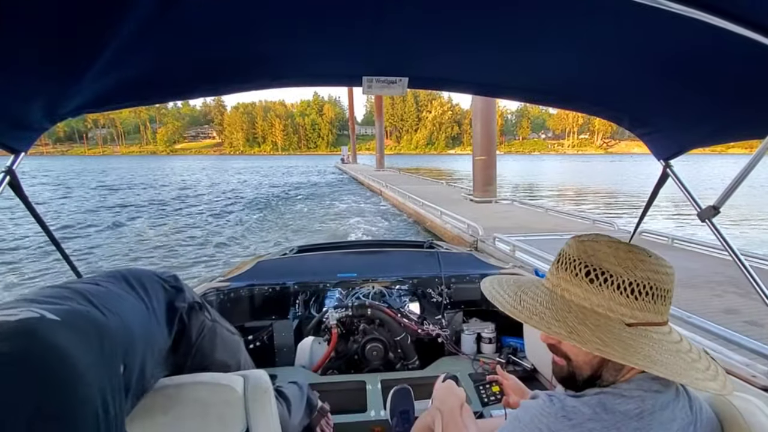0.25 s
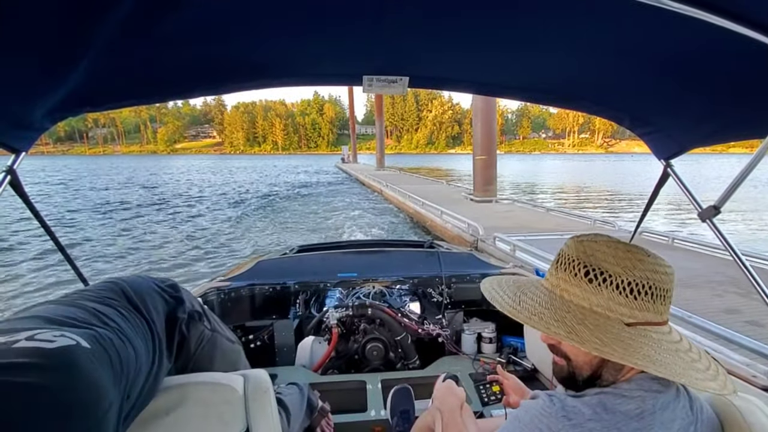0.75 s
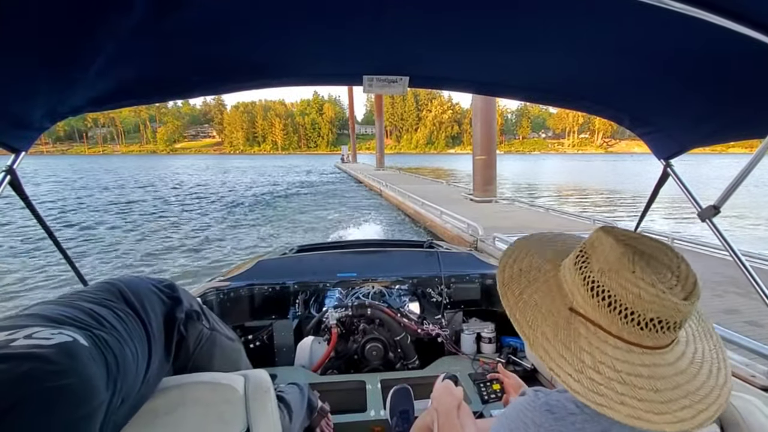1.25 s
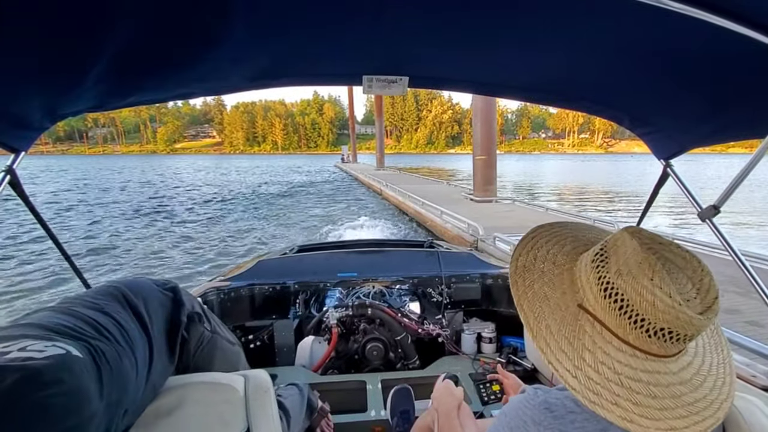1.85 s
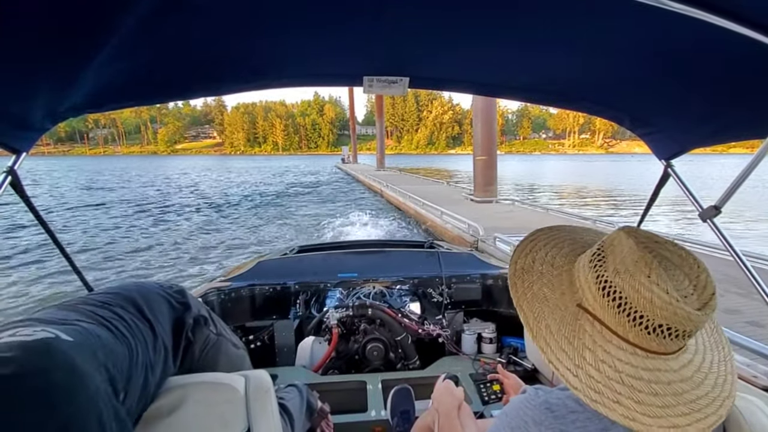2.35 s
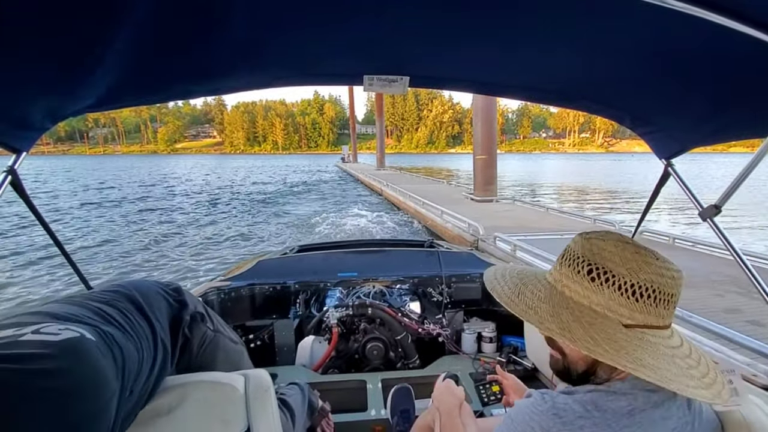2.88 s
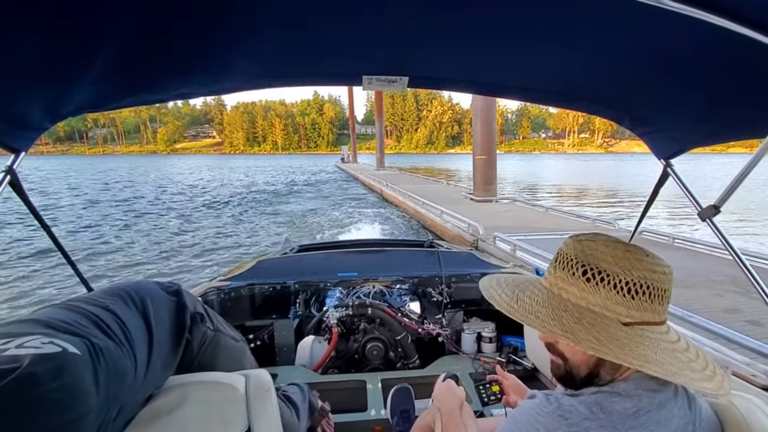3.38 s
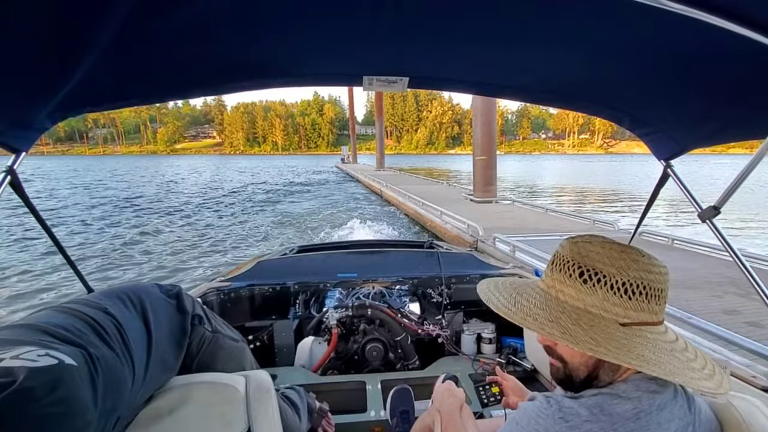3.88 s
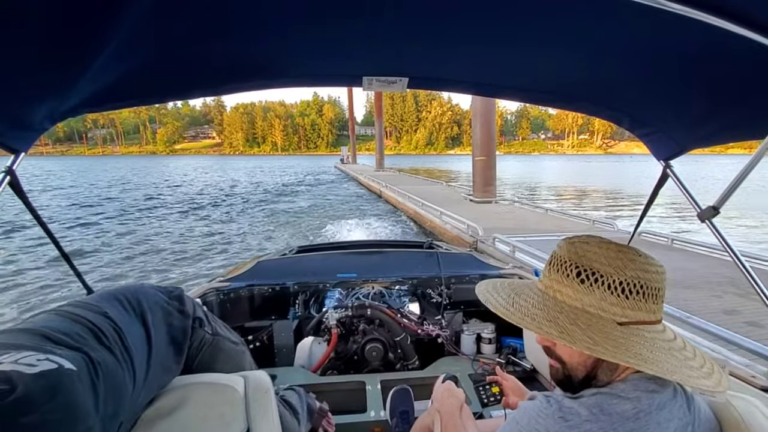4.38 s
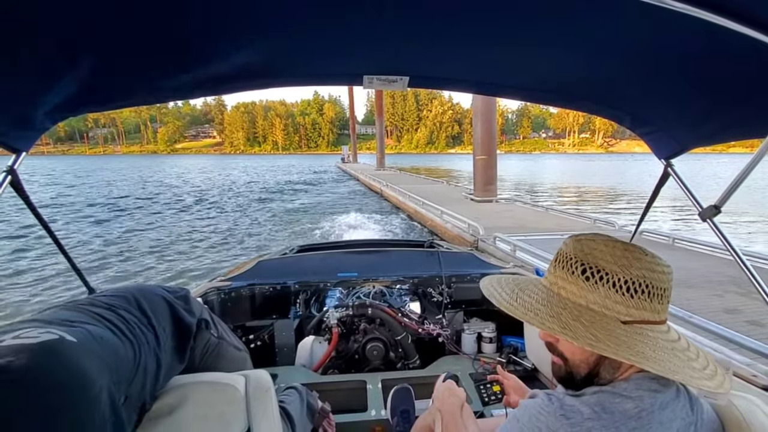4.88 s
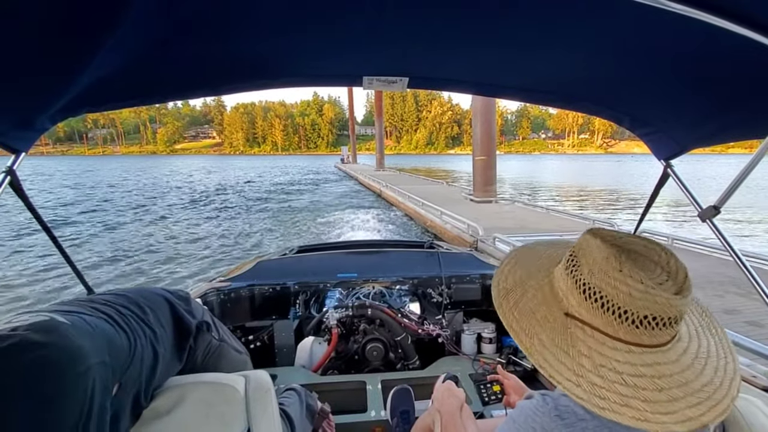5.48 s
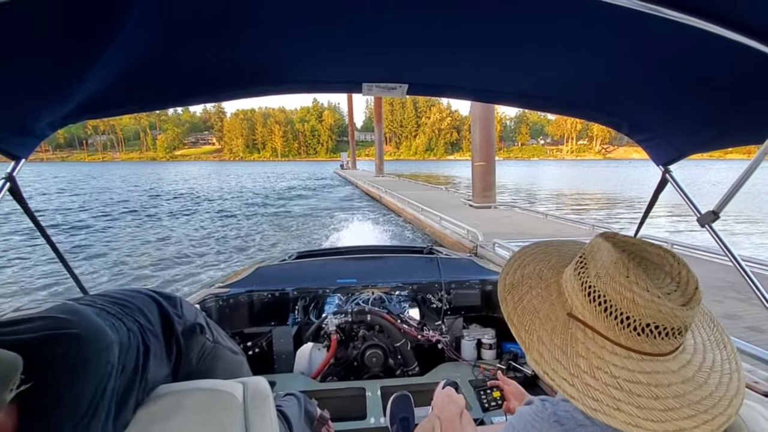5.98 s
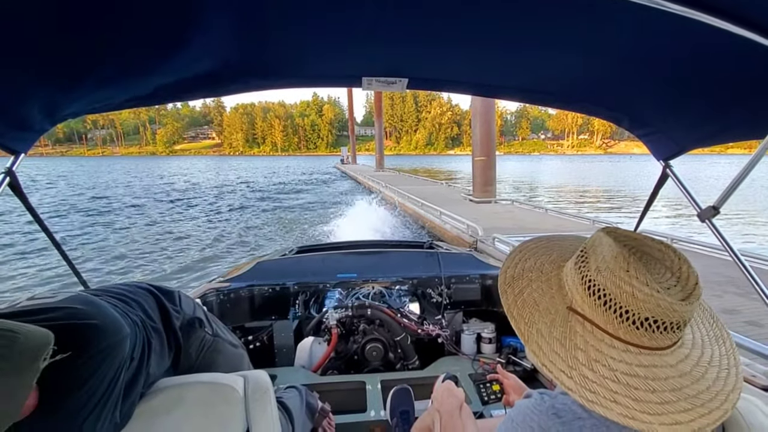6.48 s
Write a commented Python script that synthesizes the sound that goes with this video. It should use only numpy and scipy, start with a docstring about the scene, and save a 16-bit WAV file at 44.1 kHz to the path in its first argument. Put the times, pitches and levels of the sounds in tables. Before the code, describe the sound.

A small two-port microphone in a boat's cockpit hears a large eight-cylinder engine already idling at a dock. Its wet exhaust is a deep, nearly smooth boom around 66 to 70 Hz, hunting slightly and broken by short dips as water chokes the outlet. Above it are metallic block clatter, rapid valve ticks about seventeen per second, and a faint thin whine near 860 Hz. Jet wash hisses and gurgles steadily, coloured by close cockpit walls. Dull, short wave thuds strike the hull irregularly, noticeably at 1.0, 2.1, 2.6, 4.1 and 5.0 s. A sharp deck tap lands at 2.15 s, a weaker, brighter one at 5.06 s. The boom falters around 5.0 to 5.4 s; from 5.3 s the engine revs, rising to roughly 100 to 106 Hz by 6 s. Ticks fade into the roar, the whine climbs but thins, and rushing, bubbling water swells until the sound stops at 6.7 s, still revving.

```python
"""A boat at a dock, heard from the cockpit through a small two-port microphone.
From the start an eight-cylinder engine idles unsteadily: its wet exhaust booms at the firing rate, the block clatters,
valve gear ticks once a crank turn and a belt-driven part whines faintly over the hiss and gurgle of the jet's wash.
Small waves thud on the hull throughout, as decaying noise bursts; sharp taps fall on the deck near 2.1 s and 5.1 s.
From about 5.3 s the engine revs: firing, whine pitch and wash climb and stay up to the end."""
import sys
import numpy as np
from scipy import signal
from scipy.fft import rfft, irfft, next_fast_len
from scipy.io import wavfile
from scipy.ndimage import uniform_filter1d

SR = 44100
rng = np.random.default_rng(int(sys.argv[2]) if len(sys.argv) > 2 else 0)


def materialize(psi):
    """Save the field psi as 16-bit PCM at rate SR to the path in sys.argv[1].

    A 1-D psi becomes a single channel; in a 2-D psi each row is a channel.
    """
    bounded = np.clip(np.atleast_2d(psi).T, -1, 1)
    quanta = np.round(bounded * 32767).astype(np.int16)
    wavfile.write(sys.argv[1], SR, quanta)


def ratio_of_db(decibels):
    """Turn decibels (scalar or array-like) into linear amplitude factors; 0 dB maps to 1."""
    return 10 ** (np.asarray(decibels, float) / 20)


N = 296793  # length [samples]
T = np.arange(N) / SR  # time [s]
SIZE = next_fast_len(N)
HZ = np.maximum(np.fft.rfftfreq(SIZE, 1 / SR), 1)  # frequency axis of every long spectrum [Hz]
PORT_LAG_S = 0.00008  # sound reaches the left port this much before the right

# engine speed; the idle hunts a little: (time [s], firing rate [Hz])
FIRING_RATE = [(0, 69.4), (.4, 67.85), (.75, 69.3), (1.1, 66.94), (1.45, 69.45), (1.85, 66.26),
               (2.1, 69.76), (2.7, 66.7), (3.15, 69.4), (3.9, 66.1), (4.2, 66.6), (5.0, 65.14), (5.3, 66.2),
               (5.49, 73.5), (5.62, 83.55), (5.75, 92.9), (5.9, 98.9), (6.1, 106.2), (6.27, 104.9),
               (6.45, 100.6), (6.73, 102.2)]
# slow boom level, which falls when a wave covers the outlet: (time [s], level [dB])
BOOM_LEVEL = [(0, -16.5), (.22, -12), (.4, -11.5), (.55, -13.5), (.97, -12), (1.08, -18.5), (1.45, -17),
              (1.95, -11.5), (2.7, -14), (2.78, -16), (3.25, -15), (3.31, -25.5), (3.55, -16),
              (4.02, -13.5), (4.2, -16), (4.57, -16), (4.65, -21.5), (4.8, -14.5), (4.87, -18),
              (5.1, -15.5), (5.35, -23.5), (5.5, -12.5), (5.97, -14), (6.2, -15.5), (6.73, -17)]
# brief chokes of the boom: (time of the middle [s], depth [dB], width at half depth [s])
BOOM_CHOKES = [(.06, 5, 0.043), (0.32, 8, 0.044), (0.415, 12, 0.069), (1.093, 13, 0.035),
               (1.33, 2.5, 0.045), (1.476, 9, .03), (2.033, 5, 0.017), (2.14, 4, 0.019), (3.075, 5, 0.026),
               (3.3, 5, .03), (3.49, 8, 0.033), (3.58, 7, 0.031), (3.69, 5, 0.057), (3.856, 10.5, 0.034),
               (4.129, 4, .03), (4.616, 5, 0.036), (4.851, 13, 0.033), (4.932, 12, 0.041),
               (5.006, 17, 0.066), (5.17, 23, 0.051), (5.297, 10, 0.06), (5.407, 22, 0.019),
               (5.46, 7, 0.032), (5.601, 4, 0.026), (6.006, 10, 0.039), (6.166, 10, 0.045),
               (6.28, 4, 0.054), (6.404, 14, 0.026), (6.567, 6, .04), (6.629, 13, 0.012)]
# overtones against the boom: (multiple of firing rate [-], level [dB], extra at full rev [dB])
OVERTONES = [(.5, -30.5, -6), (2, -34.5, -9), (2.5, -42, 7), (4, -36, 3), (6, -45, 13.5)]
# outlet slop, relative spectrum: (frequency [Hz], density [dB per Hz])
SLOP_COLOUR = [(20, -27), (35, -10), (55, 2.5), (90, 6.5), (130, -10.5), (200, -21), (400, -45)]
# knocked parts of the block: (frequency [Hz], width [Hz], base level [dB],
# start in the cycle [0-1], share of the cycle [0-1], extra at full rev [dB])
BLOCK_PARTS = [(1269, 140, -41.5, 0.82, 0.46, 2), (812, 84, -41.5, 0.21, 0.39, -8),
               (1050, 47, -49, 0.37, 0.43, 1.5), (423, 30, -50.5, 0.1, 0.32, 5),
               (2150, 550, -46, 0.75, 0.29, -1), (4663, 160, -43, 0.27, 0.21, -2.5),
               (5480, 260, -44.5, 0.76, 0.18, -4), (6830, 530, -45.5, 0.34, 0.16, -2)]
# jet flow: (time [s], spray level [dB], low gurgle level [dB])
JET_FLOW = [(0, -3, -3), (.6, -3, -3), (1.15, -3, -4), (1.85, 0, -0.5), (2.1, -3, 2.5), (2.7, -4, -0.5),
            (3.0, -2.5, -5), (4.0, 0, -3.5), (5.2, 0, 1), (5.33, 2, 3), (5.5, 4.5, 0.5), (5.9, 4.5, 1.5),
            (6.2, 6.5, 9.5), (6.45, 5, 6), (6.73, 8, 5.5)]
# wash, relative spectrum: (frequency [Hz], density [dB per Hz])
WASH_COLOUR = [(88, 6), (150, -4), (244, -1.5), (373, -8.5), (436, -3), (481, -6.5), (948, -7.5),
               (1270, -11), (1600, -6), (2230, -8.5), (3990, -13), (5540, -12.5), (9550, -18), (10900, -14),
               (15500, -17)]
# engine bay and cockpit resonances: (frequency [Hz], width [Hz], height over the wash [dB])
BAY_RESONANCES = [(239, 22, 4), (323, 75, 6), (441, 34, 3), (561.6, 28, 7.5), (672, 19, 3.5),
                  (785, 19, 6.5), (1062, 37, 5.5), (1128, 35, 10), (1120, 24, 0.5), (1307, 40, 7),
                  (1670, 200, -5), (2286, 147, 5), (2480, 250, -3.5), (3150, 320, 3), (3930, 610, -3),
                  (4350, 100, 4.5), (4800, 80, -1), (5600, 100, -0.5), (6500, 240, 2.5), (7000, 73, 2.5),
                  (8350, 170, 4), (10100, 870, -3), (11200, 130, -7)]
# likeness of the wash at the two ports before lag and echoes: (frequency [Hz], correlation [-1 to 1])
PORT_LIKENESS = [(60, .9), (130, 0.77), (290, 0.74), (640, 0.83), (1400, 0.77), (3100, 0.44), (6800, -0.08),
                 (15000, -0.0058)]
# port balance of the wash before echoes: (frequency [Hz], left minus right [dB])
PORT_BALANCE = [(60, -0.5), (110, 26), (200, -2.5), (380, 0.5), (700, 0), (1290, 1.5), (2380, 1.5),
                (4400, -4), (8120, 1.5), (15000, 0.5)]
# change of wash colour at full rev: (frequency [Hz], change [dB])
REV_COLOUR = [(150, -4), (220, -9), (400, 0.5), (600, -0.5), (800, -3), (1300, 2), (2500, -1.5),
              (5000, 0.5), (12000, 1)]
# waves on the hull: (time [s], peak before balance [dB], ring [Hz], decay by 60 dB [s], left minus right [dB])
HULL_THUDS = [(0.239, -19, 224, 0.072, 5), (.78, -21.5, 248, 0.11, 13), (1.003, -16, 220, 0.089, 18),
              (2.093, -20, 164, 0.099, 11), (2.599, -18, 147.9, 0.17, 9), (2.72, -32, 290.3, .08, 4),
              (3.265, -25, 258, 0.14, 3), (3.37, -25, 185.5, 0.095, -1), (3.56, -19, 247, 0.21, 2),
              (4.128, -17, 190, 0.08, 0), (4.158, -16.5, 175, 0.089, 0), (4.49, -23, 259, .15, 0),
              (4.994, -17, 420, 0.045, -1), (5.163, -23, 200, 0.046, 9), (5.226, -19, 367, .06, 4),
              (6.134, -15, 300, 0.092, 1), (6.61, -23, 160, 0.083, 12), (6.69, -20.5, 310, 0.07, 5)]
# sharp taps on the deck: (time [s], peak [dB], decay by 60 dB [s], multiple of the colour's pitch [-])
DECK_TAPS = [(2.1466, -15.5, 0.078, 1.0), (5.062, -22.5, 0.045, 1.43)]
# tap, relative spectrum: (frequency [Hz], density [dB per Hz])
DECK_COLOUR = [(600, -31), (1200, -9), (1650, 9), (1900, 0.5), (2300, 5.5), (2900, -7), (3700, 1.5),
               (4300, -10), (5500, -9), (8000, -15), (12000, -28)]


def curve(table, at=T):
    """Columns of a table joined by straight lines."""
    s, *columns = np.transpose(table)
    return [np.interp(at, s, c) for c in columns]


def by_hz(table):
    """A (frequency [Hz], value) table on a log-frequency axis."""
    hz, value = np.transpose(table)
    return np.interp(np.log(HZ), np.log(np.maximum(hz, 1)), value)


def unit(x):
    """Scale to rms 1."""
    return x / np.sqrt(np.mean(x ** 2))


def walk(rate):
    """Random levels held 1 / rate s and slewed twice, without slow drift; rms 1."""
    k = int(SR / rate)
    held = np.repeat(rng.standard_normal(N // k + 1), k)
    slewed = uniform_filter1d(uniform_filter1d(held, k), k)[:N]
    return unit(slewed - uniform_filter1d(slewed, 5 * k))


def sound(spectrum):
    """Waveform of a spectrum on the HZ axis."""
    return irfft(spectrum, SIZE)[..., :N]


def pair(likeness):
    """Spectra of left and right noise with the given correlation; the left port hears it a little earlier."""
    mid, side = rfft(rng.standard_normal((2, SIZE)))
    c = np.clip(likeness, -.99, .99)
    lead = np.exp(2j * np.pi * HZ * PORT_LAG_S * np.array([[1], [0]]))
    return lead * (np.sqrt(1 + c) * mid + np.sqrt(1 - c) * side * np.array([[1], [-1]]))


def throttle():
    """Engine speed as 0 at idle (70 Hz firing or less) to 1 at full rev (102 Hz or more)."""
    hz = curve(FIRING_RATE)[0]
    return np.clip((hz - 70) / 32, 0, 1)


def boom_db():
    """Slow level of the boom, less a smooth notch for each choke."""
    s, depth_db, length = np.transpose(BOOM_CHOKES)[:, :, None]
    coarse = T[::64]
    notches = depth_db * np.exp(-4 * np.log(2) * ((coarse - s) / length) ** 2)
    return curve(BOOM_LEVEL)[0] - np.interp(T, coarse, notches.sum(axis=0))


def exhaust(firings):
    """Water-muffled firings leave a near sine; cylinders differ, so size and timing waver."""
    size = ratio_of_db(boom_db() + 0.4 * walk(25.077))
    jitter = 0.12 * (1 - 0.4 * throttle()) * walk(22)  # [rad]
    phase = 2 * np.pi * firings + jitter
    overtones = 0
    for k, db, rev_db in OVERTONES:
        level = ratio_of_db(db + rev_db * throttle() + 5.4 * walk(15))
        overtones = overtones + level * np.cos(k * phase + 1.45 * walk(14))
    boom = np.sqrt(2) * size * (np.sin(phase) + overtones)
    # water slopping at the outlet adds a rumble that differs at the two ports
    rumble = unit(sound(pair(0.38) * ratio_of_db(by_hz(SLOP_COLOUR))))
    slop_level = ratio_of_db(-12.5 - 1.37 * throttle()) * uniform_filter1d(size, int(.25 * SR))
    slop = slop_level * ratio_of_db(2.1 * walk(9)) * rumble
    return np.array([np.roll(boom, -int(PORT_LAG_S * SR)), boom]) + slop


def clatter(firings):
    """Block parts, knocked at their own moment of each eight-firing cycle, ring in narrow bands."""
    out = 0
    for hz, width, db, moment, share, rev_db in BLOCK_PARTS:
        since = (firings / 8 - moment) % 1
        pulse = np.sin(np.pi * np.clip(since / share, 0, 1)) ** 2
        knock = pulse + 0.53 + 0.5 * throttle()  # steadier at speed
        tone = unit(sound(pair(0.5) / (1 + (2 * (HZ - hz) / width) ** 2)))
        level = ratio_of_db(db + rev_db * throttle() + 0.53 * curve(JET_FLOW)[0] + 1.4 * walk(8))
        out = out + level * knock * tone
    return out


def valve_ticks(firings):
    """Envelope of the valve gear: a jump and decay once a crank turn (four firings), lost as the engine revs."""
    decay = np.exp(-((firings / 4 + 0.32) % 1) / 0.21)
    return (1 - 1.1 * throttle()) * uniform_filter1d(decay, int(0.0036 * SR)) * ratio_of_db(1.9 * walk(12))


def whine():
    """A belt-driven part gives a thin tone that follows engine speed, nearly opposite at the two ports."""
    hz = 860 + 521 * throttle()  # idle pitch and rise to full rev
    db = -47 - 15 * throttle() + 1.15 * curve(JET_FLOW)[0]  # rises with the flow, but sinks overall in the rev
    phase = 2 * np.pi * np.cumsum(hz + 5.0 * walk(5)) / SR + 0.74 * walk(25)
    return ratio_of_db(db + 4.3 * walk(8)) * np.array([np.sin(phase + 2.0), 1.67 * np.sin(phase)])


def wash(firings):
    """Churning water in overlapping bands that flicker alone, the top surging together and throbbing with valve ticks."""
    bay_db = sum(db / (1 + (2 * (HZ - hz) / width) ** 2) for hz, width, db in BAY_RESONANCES)
    side_db = by_hz(PORT_BALANCE) / 2 * np.array([[1], [-1]])
    spectrum = pair(by_hz(PORT_LIKENESS)) * ratio_of_db(by_hz(WASH_COLOUR) + bay_db + side_db)
    # the cockpit's close walls add six short echoes a port, which ripple the treble finely
    delays = 0.001006 + .012 * rng.random((2, 6, 1))  # [s]
    echoes = np.exp(-2j * np.pi * HZ * delays).sum(axis=1)
    spectrum *= 1 + .15 * np.clip(HZ / 2500, 0, 1) * echoes
    spray_db, gurgle_db = curve(JET_FLOW)
    churn_db = 0.87 * spray_db  # the mid-range follows the spray less strongly
    rev_hz, rev_db = np.transpose(REV_COLOUR)
    tick, surge, out = valve_ticks(firings), walk(16), 0
    for hz in 140 * 2 ** np.arange(0, 7.5, .5):  # half-octave spacing
        share = np.cos(np.clip(np.log2(HZ / hz), -.5, .5) * np.pi)
        high = np.clip(np.log2(hz / 2200), 0, 1)
        low = np.clip(np.log2(560 / hz), 0, 1)
        # large bubbles burst unevenly, fine spray is smooth
        flicker = 3.23 * np.clip(300 / hz, 0, 1) ** 0.5 * walk(22) + 0.37 * high * surge
        throb = 5.0 * tick * np.exp(-np.log2(hz / 5500) ** 2 / 1.7)
        lift = throttle() * np.interp(np.log(hz), np.log(rev_hz), rev_db)
        flow = high * spray_db + low * gurgle_db + (1 - high - low) * churn_db
        out = out + sound(spectrum * share) * ratio_of_db(flicker + throb + lift + flow)
    return unit(out) * ratio_of_db(-28.5)


def burst(colour, t60, likeness, blow, attack_s, size=8192):
    """Noise in both ports, struck and fading, through a colour on the HZ axis; the ports' mean peaks at 1."""
    mid, side = rng.standard_normal((2, size))
    t = np.arange(size) / SR
    noise = mid * likeness + side * np.array([[1], [-1]])
    fading = noise * np.exp(-np.log(1000) * t / t60) * np.clip(t / attack_s, 0, 1)
    fading[:, 0] += blow * np.sqrt(t60 * SR)  # the first contact is one clean push
    late = np.roll(fading, 512, axis=1)  # leaves room for ringing ahead of the blow
    x = irfft(rfft(late) * np.interp(np.fft.rfftfreq(size, 1 / SR), HZ, colour), size)
    return x / np.abs(x.mean(axis=0)).max()


def add(out, s, x):
    """Mix a burst in with its blow, 512 samples into it, at time s."""
    i = int(s * SR) - 512
    out[:, i:i + x.shape[1]] += x[:, :N - i]


def hull():
    """Slaps of water ring the hull raggedly around a low pair of resonances; hard taps crackle high."""
    out = np.zeros((2, N))
    for s, db, hz, t60, pan_db in HULL_THUDS:
        lower = 1 / (1 + (2 * (HZ - hz) / (0.41 * hz)) ** 2)
        upper = 0.12 / (1 + (2 * (HZ - 2.0 * hz) / 300) ** 2)
        level = ratio_of_db(db + np.array([[pan_db], [-pan_db]]) / 2)
        add(out, s, level * burst(lower + upper, t60, likeness=1.27, blow=0.29, attack_s=0.0042))
    for s, db, t60, pitch in DECK_TAPS:
        colour = ratio_of_db(by_hz(np.multiply(DECK_COLOUR, [pitch, 1])))
        add(out, s, ratio_of_db(db) * burst(colour, t60, likeness=1.0, blow=.08, attack_s=0.0013))
    return out


def scene():
    """All sources; one running count of firings times the exhaust, clatter and valve ticks."""
    firings = np.cumsum(curve(FIRING_RATE)[0]) / SR
    return exhaust(firings) + clatter(firings) + whine() + wash(firings) + hull()


def band_limit(x):
    """A steep low-pass at the top of the band."""
    return signal.sosfilt(signal.butter(12, 15660, fs=SR, output="sos"), x)


def record(dry):
    """The recorder cuts the top steeply above 15640 Hz."""
    low_pass = signal.ellip(10, .2, 60, 15640, fs=SR, output="sos")
    dull = signal.sosfilt(low_pass, dry)
    return band_limit(dull)


dry = scene()
out = record(dry)
materialize(out)
```